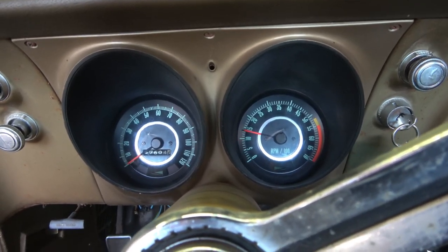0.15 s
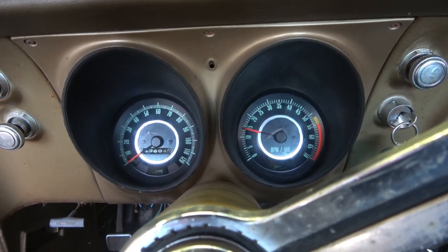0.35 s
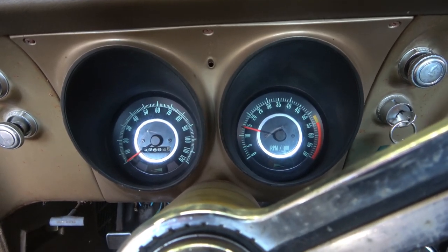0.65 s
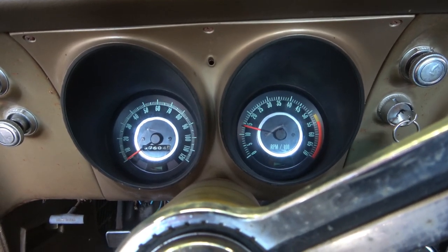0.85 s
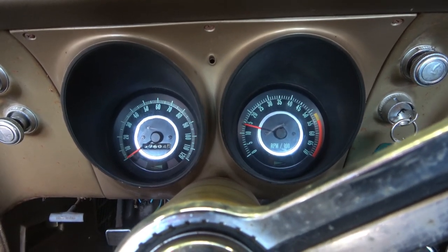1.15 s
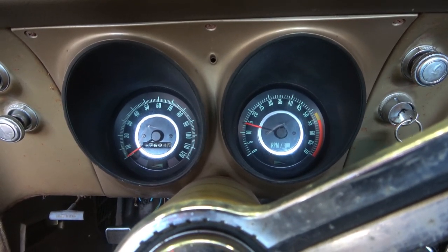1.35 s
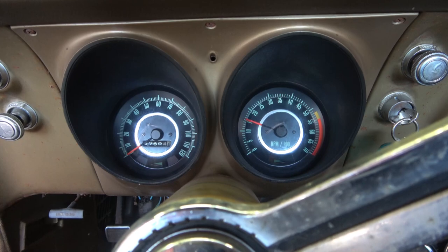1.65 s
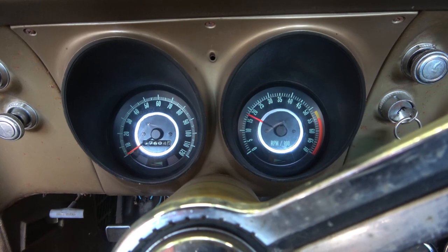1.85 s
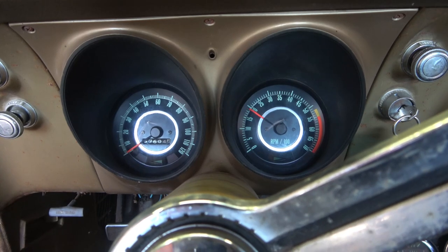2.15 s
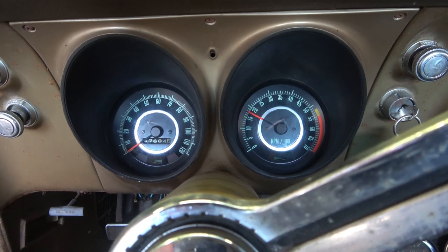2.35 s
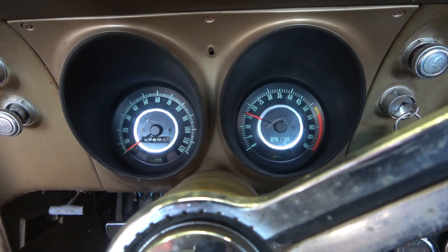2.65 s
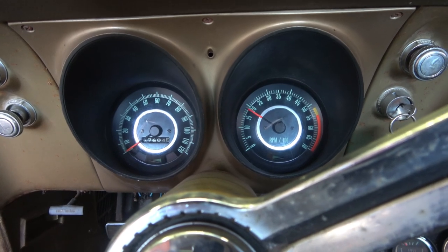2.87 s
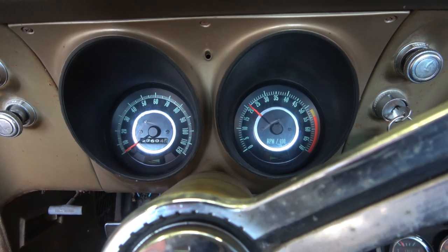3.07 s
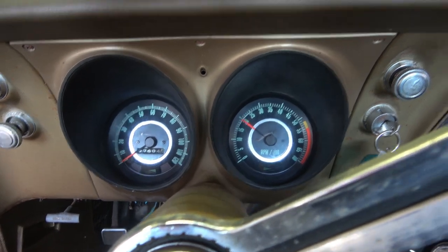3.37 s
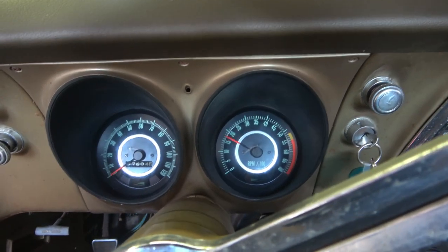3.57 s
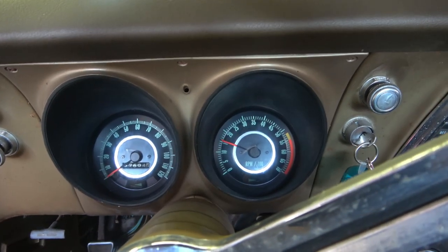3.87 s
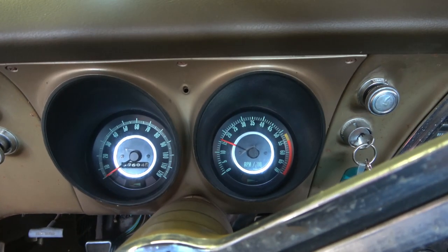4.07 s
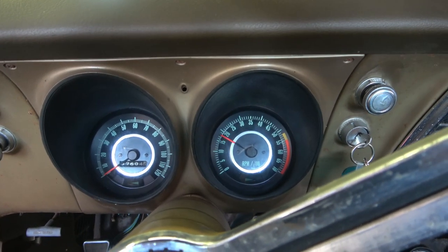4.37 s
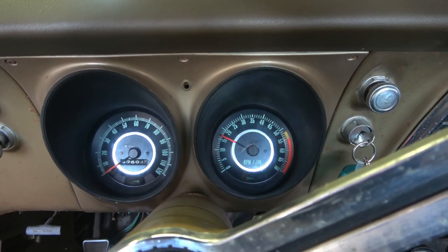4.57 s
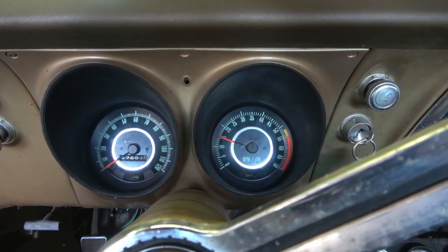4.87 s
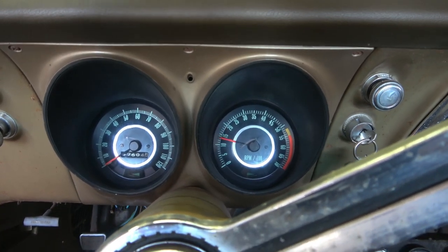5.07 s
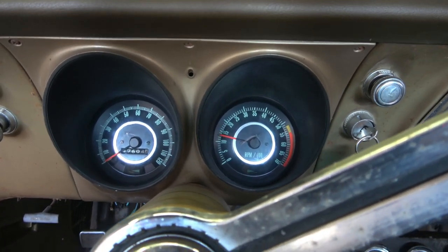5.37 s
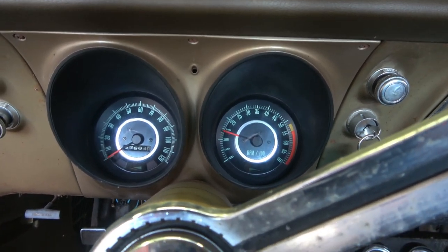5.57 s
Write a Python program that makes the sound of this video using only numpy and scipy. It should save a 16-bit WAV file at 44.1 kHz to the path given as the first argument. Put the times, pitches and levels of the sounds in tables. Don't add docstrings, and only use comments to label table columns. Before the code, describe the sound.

Inside an old car in a garage, an already running V8 holds a deep, fast idle, then is blipped: a swell near two seconds, a higher one at three, a smaller one after four, and a new rise at the end. Low boom dominates, with uneven throb, valve clatter, throttle hiss and small gas puffs. Close mono microphone at the driver's seat, slightly saturated.

```python
import sys
import numpy as np
from scipy import signal
from scipy.fft import rfft, irfft, next_fast_len
from scipy.io import wavfile
from scipy.ndimage import uniform_filter1d

SR = 44100
rng = np.random.default_rng(int(sys.argv[2]) if len(sys.argv) > 2 else 0)


def output_pcm(signal):
    pcm = np.clip(np.atleast_2d(signal).T, -1, 1) * 32767
    wavfile.write(sys.argv[1], SR, np.round(pcm).astype(np.int16))


def linear_from_db(decibels):
    return 10 ** (np.asarray(decibels, float) / 20)


N = 252252

CYLINDERS = 8
IDLE_HZ = 80
FULL_LOAD = 0.77

# (time [s], firing rate [Hz])
SPEED = [(0, 79.97), (1.3, 80.0), (1.53, 86.87), (1.83, 110.5), (1.91, 115), (2.3, 96), (2.45, 91.81),
         (2.64, 95.58), (2.8, 112.3), (2.97, 132.5), (3.15, 116.7), (3.3, 108.5), (3.79, 86.8), (4.06, 100),
         (4.24, 109.3), (4.6, 87.62), (5.04, 71), (5.72, 87.7)]
# (time [s], throttle opening [0-1])
THROTTLE = [(0, 0.64), (1.33, 0.52), (1.6, 0.85), (1.91, 0.57), (1.97, 0.28), (2.3, 0), (2.43, 0.13),
            (2.72, 0.94), (2.9, 0.82), (2.97, 0.13), (3.8, 0), (3.93, 0.71), (4.24, 0.42), (4.285, 0.02),
            (5.05, 0.08), (5.19, 0.51), (5.39, 0.87), (5.72, 0.61)]


def follow(curve):
    return np.interp(np.arange(N) / SR, *np.transpose(curve))


def evened(x):
    return x / np.sqrt(np.mean(x ** 2) + 1e-20)


def colour(x, points, peaks=()):
    size = next_fast_len(N + SR)
    hz = np.fft.rfftfreq(size, 1 / SR)
    point_hz, point_db = np.transpose(points)
    gain_db = np.interp(np.log(hz + 1), np.log(point_hz + 1), point_db, -90, -90)
    for at_hz, width_hz, top_db in peaks:
        gain_db += top_db / (1 + (2 * (hz - at_hz) / width_hz) ** 2)
    return evened(irfft(rfft(x, size) * linear_from_db(gain_db), size)[:N])


def wander(per_s, count=1):
    t = np.arange(0, N + 256, 256) / SR
    hz = np.geomspace(per_s / 10, per_s, 12)
    phase = rng.random((count, 12, 1))
    slow = (np.sin(2 * np.pi * (hz[:, None] * t + phase)) / np.sqrt(6)).sum(1)
    return np.array([np.interp(np.arange(N) / SR, t, row) for row in slow])


def flatten(x, seconds):
    size = round(seconds * SR)
    power = uniform_filter1d(uniform_filter1d(x ** 2, size), size)
    return x / np.sqrt(power + 1e-9)


def patchy(x, patchy_db, frames=5, bins=12):
    z = signal.stft(x, nperseg=256)[2]
    patches = uniform_filter1d(rng.standard_normal(z.T.shape), frames, 0)
    patches = uniform_filter1d(patches, bins, 1)
    swollen = z * linear_from_db(patchy_db * evened(patches.T))
    return evened(signal.istft(swollen, nperseg=256)[1][:N])


def effort_db(shut_db, open_db, shut_db_per_hz, open_db_per_hz):
    throttle = follow(THROTTLE)
    slope = shut_db_per_hz + (open_db_per_hz - shut_db_per_hz) * throttle
    return shut_db + open_db * throttle + slope * (follow(SPEED) - IDLE_HZ)


def missed_db():
    # (time [s], loss [dB])
    misses = [(2.36, -5), (2.495, -5), (2.8, -5), (3.635, -13), (3.785, -5.5), (4.54, -7), (4.625, -8.5),
              (4.83, -4), (4.975, -8), (5.06, -15), (5.21, -8), (5.33, -15)]
    miss_s = 0.026
    t = np.arange(N) / SR
    return sum(db * np.exp(-((t - s) / miss_s) ** 2) for s, db in misses)


def walls(x, t60_s=0.18, wet=0.072):
    t = np.arange(SR // 4) / SR
    hits = rng.choice([-1., 1.], len(t)) * (rng.random(len(t)) < .1)
    tail = hits * linear_from_db(-60 * t / t60_s) * (t > .002)
    reflected = signal.oaconvolve(x, tail / np.linalg.norm(tail))[:N]
    return np.sqrt(1 - wet) * x + np.sqrt(wet) * reflected


def floor_pan(swell_db=2.5):
    # (frequency [Hz], level [dB])
    floor_mode = [(25, -30), (42, -16), (51.5, 0), (62, -18), (90, -40)]
    drum = flatten(colour(rng.standard_normal(N), floor_mode), seconds=.12)
    return linear_from_db(effort_db(-37.5, -.5, 0.0, 0.0) + swell_db * wander(per_s=3)[0]) * drum


def fan():
    # (frequency [Hz], level [dB])
    fan_air = [(1200, -18), (2000, 2), (3300, -1), (4500, -18), (6000, -30)]
    rush = patchy(colour(rng.standard_normal(N), fan_air), patchy_db=0.5)
    return linear_from_db(effort_db(-72, -4, 0.3524, 0.3357)) * rush


def puff_rows(firings):
    # (time [s], peak level [dB], whistle pitch [Hz])
    big_puffs = [(0.043, -36.5, 5550), (0.547, -38, 5250), (0.757, -39.5, 5360), (1.059, -41, 5340),
                 (1.3544, -35.5, 4700), (1.55, -38.5, 5400), (1.648, -39, 5200), (1.845, -46, 5500),
                 (3.738, -48, 4406), (3.9223, -39, 5770), (4.0794, -41, 6203), (4.1195, -45, 5600),
                 (4.8509, -43, 4300), (5.164, -40.5, 5530), (5.302, -40.5, 5427), (5.3782, -39, 5570)]
    first_firing = 4.9
    usual_db, load_gain_db, spread_db = -57.5, 18, 1
    usual_hz, wide_gap_hz, spread_hz = 5530, 4850, 110
    whistle, big_whistle = .74, .5
    throttle = follow(THROTTLE)
    rows = [(s, db, hz, big_whistle) for s, db, hz in big_puffs]
    at = np.flatnonzero(np.diff(np.floor((firings - first_firing) / CYLINDERS)))
    for i, (level_luck, pitch_luck, gap_luck) in zip(at, rng.standard_normal((100, 3))):
        if min(abs(i / SR - puff[0]) for puff in big_puffs) > .04:
            load_db = load_gain_db * min(throttle[i] / FULL_LOAD, 1)
            hz = wide_gap_hz if gap_luck > .8 else usual_hz
            peak_db = usual_db + load_db + spread_db * level_luck
            rows.append((i / SR, peak_db, hz + spread_hz * pitch_luck, whistle))
    return rows


def leak(firings, rise_s=0.0082, fall_s=.018, width_hz=260):
    # (frequency [Hz], level [dB])
    gas_spectrum = [(3500, -24), (5000, 3.5), (8000, 1), (12000, -4.5), (15900, -23)]
    t, out = np.arange(SR // 4) / SR, np.zeros(N + SR)
    air = colour(rng.standard_normal(N), gas_spectrum)
    envelope = (1 - np.exp(-t / rise_s)) * np.exp(-t / fall_s)
    smooth = signal.butter(2, width_hz / 2, fs=SR)
    for s, peak_db, hz, whistle in puff_rows(firings):
        a, b = rng.standard_normal((2, len(t)))
        fuzz = signal.lfilter(*smooth, a + 1j * b)
        tone = evened((fuzz * np.exp(2j * np.pi * hz * t)).real)
        at = round(s * SR)
        gas = (1 - whistle) * np.resize(air[at:], len(t)) + whistle * tone
        out[at:at + len(t)] += linear_from_db(peak_db - 4.5) * envelope * gas
    seep = linear_from_db(-72.5 + 3.3 * wander(per_s=23)[0]) * air
    return out[:N] + seep


def intake(firings):
    # (frequency [Hz], level [dB])
    hiss_spectrum = [(700, -18), (1000, -3), (1250, 11.5), (1600, 7.5), (2200, -19), (3200, -6.5),
                     (4400, -2.5), (5050, 1), (5770, 0), (7660, -5), (10000, -8.5), (13500, -17.5),
                     (15900, -26)]
    gulp_db = 0.65 * np.cos(2 * np.pi * firings + 6.4) + 0.61 * wander(per_s=15)[0]
    air = colour(rng.standard_normal(N), hiss_spectrum, [(5550, 260, 4.9), (5100, 120, 2.2)])
    return linear_from_db(effort_db(-68, 20.5, 0.23, 0.1881) - 0.5 + gulp_db) * patchy(air, patchy_db=1.5)


def clatter(firings, tick_db=1.0, ticks_per_s=2500):
    # (frequency [Hz], level [dB])
    clatter_spectrum = [(300, -38), (380, -7), (420, -8.5), (560, -4.5), (780, -9), (1000, -6), (1500, -12),
                        (2000, -14.5), (3440, -21.5), (4400, -23.5), (8000, -35), (11200, -42),
                        (15900, -49)]
    # (frequency [Hz], width [Hz], gain [dB])
    block_modes = [(370.7, 85, 9.5), (469.5, 21.4, 7), (573, 74, 4.5), (696, 28, 6.5), (1226, 170, 5.5),
                   (3650, 1170, 6.5)]
    sizes = linear_from_db(tick_db * np.minimum(rng.exponential(1, N), 5))
    ticks = sizes * (rng.random(N) < ticks_per_s / SR) * rng.choice([-1., 1.], N)
    drive = evened(ticks) + 1.37 * rng.standard_normal(N)
    beat_db = 0.44 * np.cos(2 * np.pi * firings) + 0.063 * wander(per_s=16)[0]
    ringing = patchy(colour(drive, clatter_spectrum, block_modes), patchy_db=0.85)
    return linear_from_db(effort_db(-50.5, 5.5, 0.0971, 0.1285) + 1.0 + beat_db) * ringing


def throb(firings, waver_db=3):
    # (frequency [Hz], level [dB])
    cabin_response = [(5, -32), (30, -16), (43, -6.5), (52, -6.5), (65, -15.5), (74, -6), (100, 1),
                      (122, -8.5), (150, -4.5), (178, -10.5), (210, -12.5), (265, -11.5), (370, -20.5),
                      (410, -28)]
    # (frequency [Hz], width [Hz], gain [dB])
    panel_modes = [(87, 6, 9), (131, 6, 6), (146, 7, 8), (267, 10, 5), (292, 10, 2)]
    cycle_orders = {4: -6, 5: -4, 6: -7, 10: 0, 11: 0, 12: -8, 13: -1, 14: -5, 15: -4, 17: -4, 18: -6, 27:
                    -2, 29: -1, 32: -2, 38: -4, 39: -1}
    faint_db = -8
    rough_coasting, rough_pulling, steady_throttle = .62, .26, .42

    orders = [k for k in range(2, 40) if k % CYLINDERS or k in cycle_orders]
    drift = wander(per_s=4, count=2 * len(orders))
    lines = np.zeros(N)
    for i, k in enumerate(orders):
        level = linear_from_db(cycle_orders.get(k, faint_db) + waver_db * drift[2 * i])
        turns = k * firings / CYLINDERS + rng.random()
        lines += level * np.cos(2 * np.pi * turns + .25 * drift[2 * i + 1])
    burns = np.diff(np.floor(firings), prepend=0) * rng.standard_normal(N)
    shake = .5 * evened(burns) + rng.standard_normal(N)
    throttle = uniform_filter1d(follow(THROTTLE), SR // 10)
    rough = np.interp(throttle, [0, steady_throttle], [rough_coasting, rough_pulling])
    boom = (1 - rough) * colour(lines, cabin_response)
    boom += rough * colour(shake, cabin_response, panel_modes)
    return linear_from_db(effort_db(-30.5, 3, -0.013, 0.085) + .45 * missed_db()) * flatten(boom, seconds=.25)


def note_level_db(speed, throttle, load):
    # (firing rate [Hz], coasting level [dB], full-load level [dB])
    cabin_boom = [(71, -29, -25), (73.5, -29.5, -29), (80, -25, -19.5), (84.7, -28, -15),
                  (91.7, -27, -18.5), (92.5, -25.5, -25), (95.8, -23.5, -19.5), (100.3, -24.5, -15),
                  (108.4, -27, -20.5), (114, -39, -22.5), (120.7, -46, -45), (135, -23.5, -31)]
    lift_db, lift_s = -6.5, 0.05
    hz, coast_db, full_db = np.transpose(cabin_boom)
    closing = uniform_filter1d(-np.gradient(throttle) * SR * lift_s, round(lift_s * SR))
    lift = np.clip(closing, 0, 1)
    boom_db = (1 - load) * np.interp(speed, hz, coast_db) + load * np.interp(speed, hz, full_db)
    return boom_db + 2 * lift_db * lift + missed_db()


def firing_note(firings):
    # (firing rate [Hz], second [dB], third [dB])
    overtones = [(72, -45, -59), (80, -32.5, -42.5), (85.6, -42, -47.5), (100, -47, -69), (119, -50, -38),
                 (130.3, -27.5, -49)]
    overtone_load_db = 10
    speed, throttle = follow(SPEED), follow(THROTTLE)
    load = np.clip(throttle / FULL_LOAD, 0, 1)
    hz, second_db, third_db = np.transpose(overtones)
    coast_loss_db = overtone_load_db * (1 - load)
    second_db = np.interp(speed, hz, second_db) - coast_loss_db
    third_db = np.interp(speed, hz, third_db) - coast_loss_db
    phase, burn_db = 2 * np.pi * firings, wander(per_s=28, count=2)
    note = linear_from_db(note_level_db(speed, throttle, load) + .6 * burn_db[0]) * np.cos(phase)
    note += linear_from_db(second_db + 0.24 * burn_db[1]) * np.cos(2 * phase + .5)
    note += linear_from_db(third_db) * np.cos(3 * phase + 1.33)
    return np.sqrt(2) * note


def scene():
    firings = np.cumsum(follow(SPEED)) / SR + 0.55
    engine_bay = fan() + leak(firings) + intake(firings) + clatter(firings)
    return (walls(engine_bay) + floor_pan() + throb(firings) + firing_note(firings))[None]


def roll_off(x):
    return signal.sosfilt(signal.butter(12, 15710, fs=SR, output="sos"), x)


def record(dry, ceiling=0.43):
    mix = ceiling * np.tanh(dry / ceiling)
    return roll_off(mix)


dry = scene()
out = record(dry)
output_pcm(out)
```